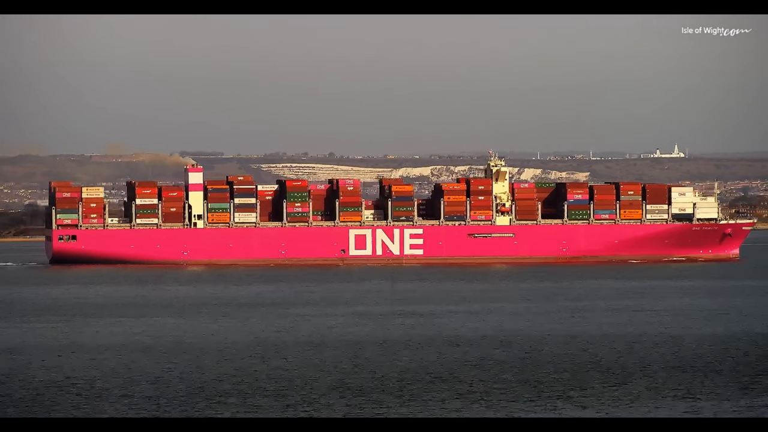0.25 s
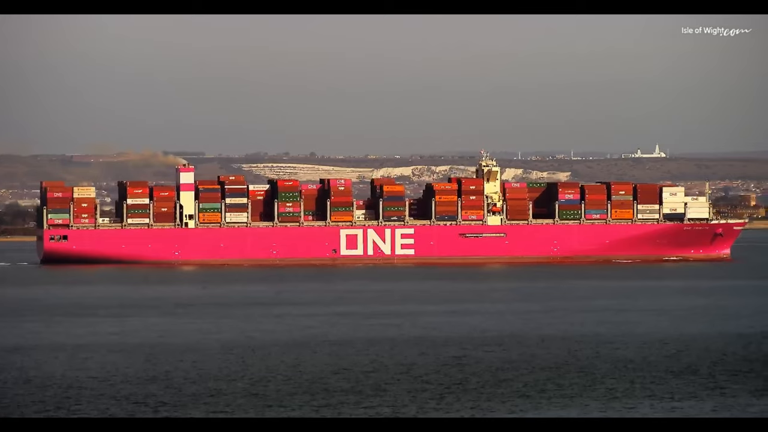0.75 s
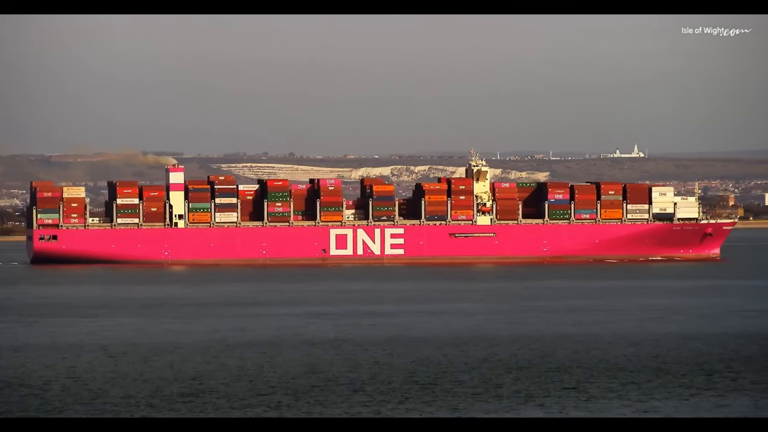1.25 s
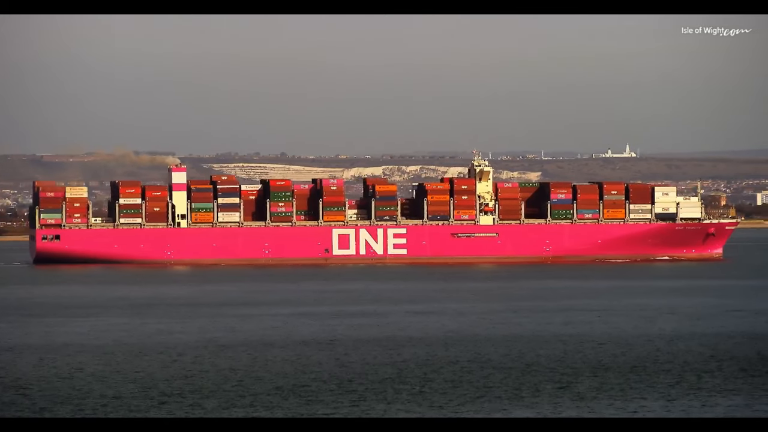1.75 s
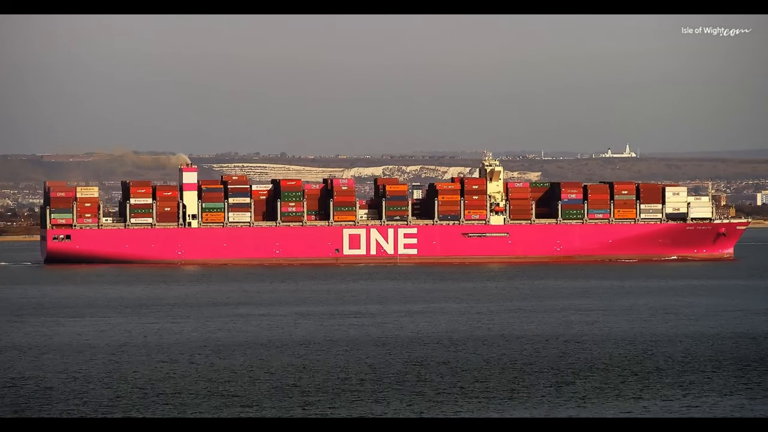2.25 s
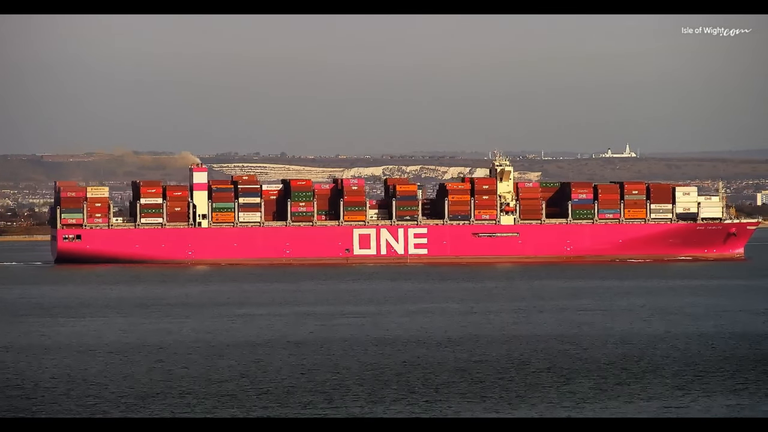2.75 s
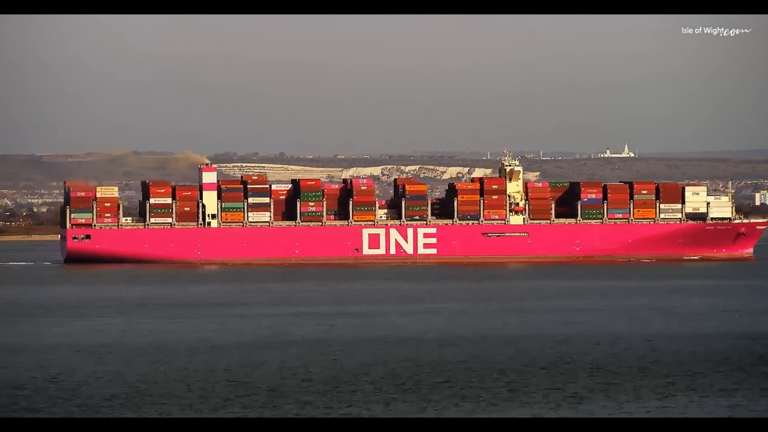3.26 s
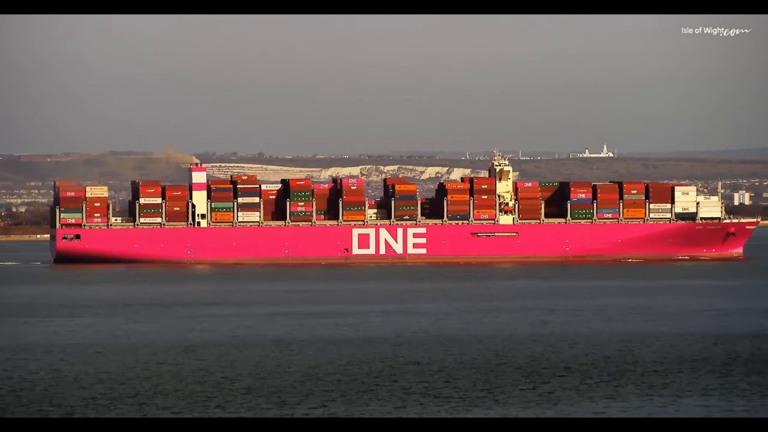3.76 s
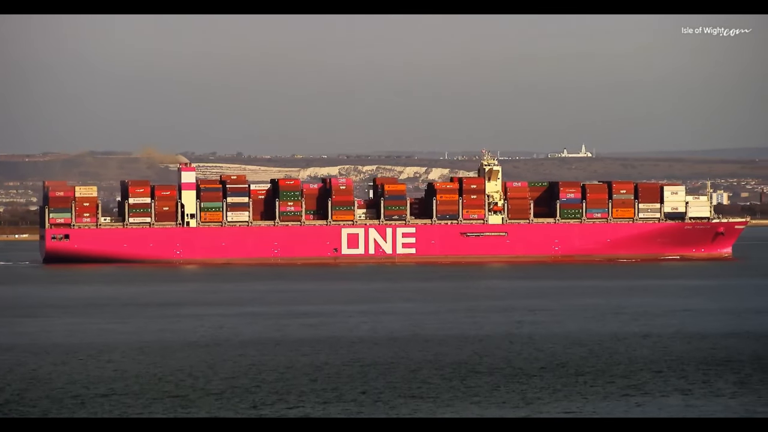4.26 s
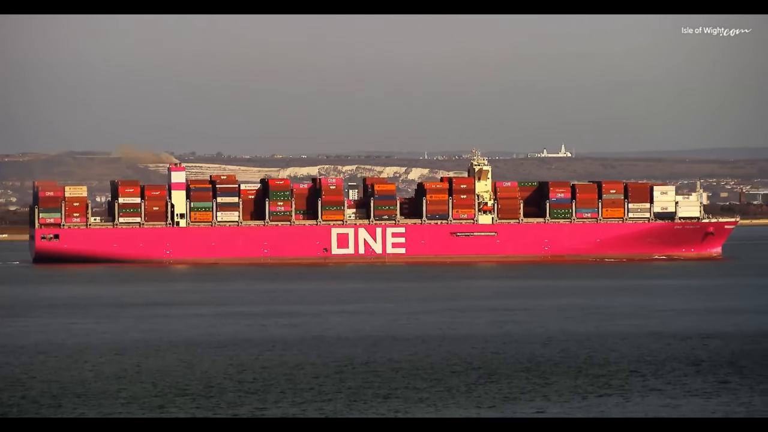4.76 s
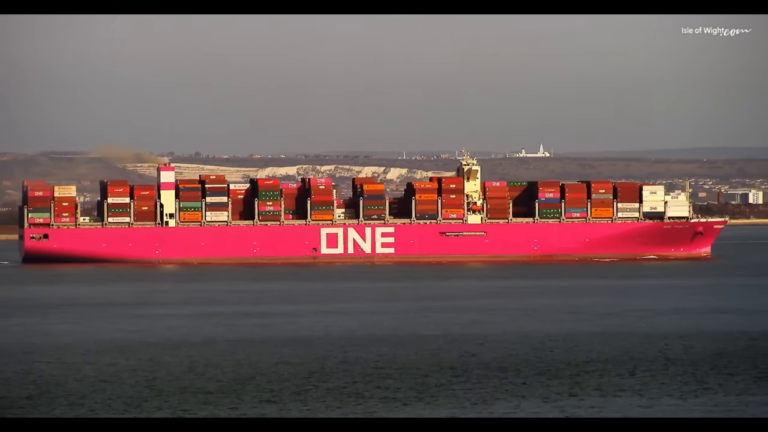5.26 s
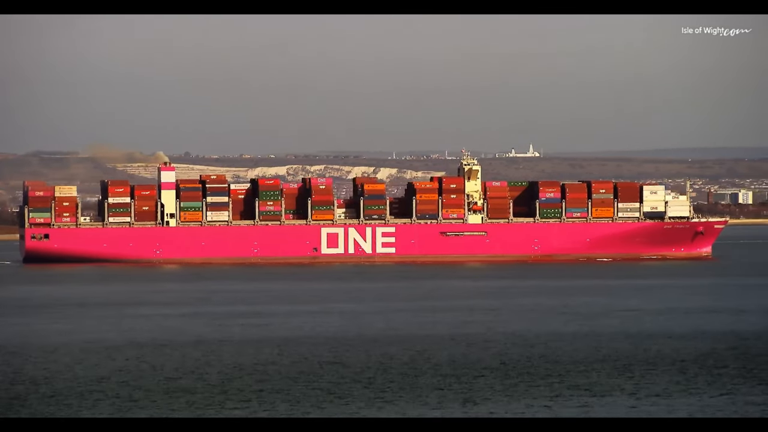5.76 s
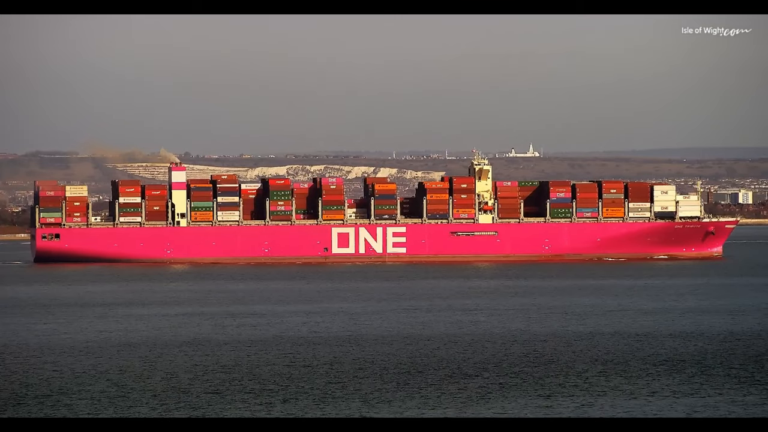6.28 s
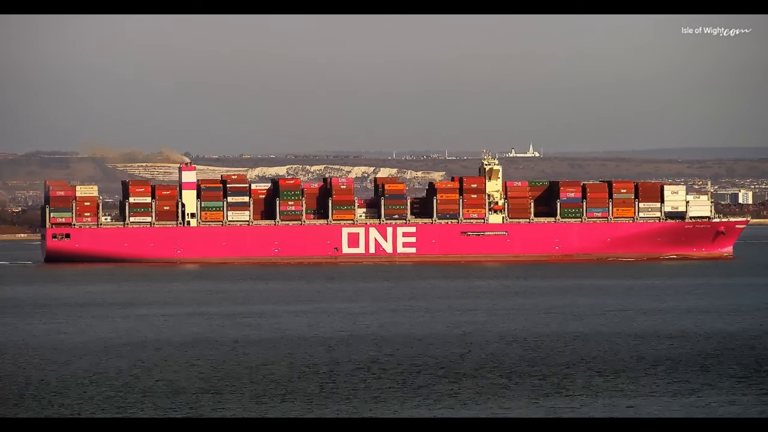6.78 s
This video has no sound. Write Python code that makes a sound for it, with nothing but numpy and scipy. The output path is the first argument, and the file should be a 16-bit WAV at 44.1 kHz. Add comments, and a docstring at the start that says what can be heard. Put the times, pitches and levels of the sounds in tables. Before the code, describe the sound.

Distant traffic rumbles and roars across open water, with a ship's heavy engine humming steadily through it.

```python
"""A low rumble and dull roar of distant town traffic across open water, one engine humming through it. Far
engines merge into the rumble, with deep booms; tyres into the roar, which grows a little midway and has brief
swells. Faint tread whine and hiss lie on top; nearer exhausts growl and surge. The heavy engine fires near 100
Hz and slowly gains speed; weaker steady tones follow the same shaft speed."""
import sys
import numpy as np
from scipy import signal
from scipy.fft import rfft, irfft, next_fast_len
from scipy.io import wavfile
from scipy.ndimage import uniform_filter1d

SR = 44100
rng = np.random.default_rng(int(sys.argv[2]) if len(sys.argv) > 2 else 0)


def to_wav(sig):
    """Store sig (one row per channel, or 1-D mono) as 16-bit WAV at the path in sys.argv[1].

    Samples outside -1..1 are clipped; the rate is SR.
    """
    pcm = np.clip(np.atleast_2d(sig), -1, 1) * 32767
    pcm = np.round(pcm).astype(np.int16)
    wavfile.write(sys.argv[1], SR, pcm.T)  # frames by channels


N = 309582


def from_db(db):
    """Decibels to gain."""
    return 10 ** (np.asarray(db) / 20)


def curve(rows):
    """Rows of (t/s, value), interpolated per sample."""
    return np.interp(np.arange(N) / SR, *np.transpose(rows))


def ramp(per_s):
    """Linear trend, zero at mid-scene."""
    return per_s * (np.arange(N) - N / 2) / SR


def bell(at_s, sigma_s):
    """Gaussian envelope, peak 1."""
    out = np.zeros(N)
    near = np.arange(max(int((at_s - 5 * sigma_s) * SR), 0), min(int((at_s + 5 * sigma_s) * SR), N))
    out[near] = np.exp(-.5 * ((near / SR - at_s) / sigma_s) ** 2)
    return out


def lifts(rows):
    """Smooth passing rises in level, in dB."""
    return sum(db * bell(at_s, sigma_s) for at_s, sigma_s, db in rows)


def drift(rate_hz):
    """Random wander, standard deviation 1: noise low-passed at rate_hz."""
    hop, settle = 40, 2000
    pole = np.exp(-2 * np.pi * rate_hz * hop / SR)
    white = rng.standard_normal(N // hop + settle + 2)
    slow = signal.lfilter([1], [1, -2 * pole, pole * pole], white)[settle:]
    return np.interp(np.arange(N) / hop, np.arange(len(slow)), slow / slow.std())


def roar(colour, humps, band_hz):
    """Many far sources merged: coloured noise with peaks and dips, rms 1 inside the band."""
    size = next_fast_len(N)
    hz = np.maximum(np.arange(size // 2 + 1) * SR / size, 1)
    colour_hz, colour_db = np.transpose(colour)
    db = np.interp(np.log(hz), np.log(colour_hz), colour_db)
    for centre_hz, width_hz, height_db in humps:
        db += height_db / (1 + (2 * (hz - centre_hz) / width_hz) ** 2)
    spectrum = rfft(rng.standard_normal(size)) * from_db(db)
    in_band = irfft(spectrum * (hz > band_hz[0]) * (hz < band_hz[1]), size)
    return irfft(spectrum, size)[:N] / in_band.std()


def steady(x, window_s):
    """Running engines keep their power: swells slower than the window are evened out."""
    size = int(window_s * SR)
    power = uniform_filter1d(uniform_filter1d(x * x, size), size)
    return x * x.std() / np.sqrt(power + 1e-12)


def rumble():
    """Far engines merge into a deep rumble that throbs at random and slowly grows."""
    # rumble spectrum: f/Hz, level/dB
    colour = [(5, -31.5), (16, -10), (27, -9.5), (40, -4.5), (68, -5), (85, -10), (120, -28), (300, -63.5),
              (2000, -120)]
    # exhaust resonances: f/Hz, width/Hz, gain/dB
    humps = [(31, 8, 8.5), (50.5, 9.5, 9), (61, 7.1, 5.5)]
    level_db = -33.5 + ramp(per_s=0.35) + drift(3.1)
    return from_db(level_db) * steady(roar(colour, humps, band_hz=(20, 85)), window_s=0.24)


def booms():
    """Now and then the rumble gathers into a boom around one unsteady pitch."""
    # booms: t/s, sigma/s, f/Hz, level/dB
    events = [(.45, 0.045, 49.9, -27.5), (.89, 0.083, 55.8, -34.5), (1.74, 0.11, 46.8, -30.5),
              (2.42, 0.054, 55, -28.5), (2.7, 0.068, 51.3, -27.5), (3.13, 0.029, 28, -27),
              (3.76, 0.032, 45, -29.5), (4.1, 0.026, 52, -26.5), (4.33, 0.04, 52.3, -33),
              (4.48, 0.044, 54, -28), (4.63, 0.033, 54, -26.5), (5.14, 0.042, 51, -29),
              (5.3, 0.046, 52.4, -30), (5.82, 0.054, 55, -34), (6.36, .05, 32, -30),
              (6.61, 0.032, 51.4, -32), (6.88, 0.044, 50, -35.5)]
    waver_hz = 3.94
    out = np.zeros(N)
    for at_s, sigma_s, hz, db in events:
        phase = 2 * np.pi * np.cumsum(hz + waver_hz * drift(11.2)) / SR
        out += from_db(db) * bell(at_s, sigma_s) * np.sqrt(2) * np.sin(phase)
    return out


def wall_echoes(x):
    """Late copies from nearby walls ripple the spectrum; the power stays the same."""
    # reflections: delay/s, gain/dB
    echoes = [(.0118, -22), (.0193, -23), (.031, -22)]
    out = x + sum(from_db(db) * np.roll(x, int(delay_s * SR)) for delay_s, db in echoes)
    return out * x.std() / out.std()


def churn(x, depth_db, rate_hz):
    """Eddies along the way lift and drop each octave of the roar on its own."""
    # octave centres: f/Hz
    centres_hz = (250, 500, 1000, 2000)
    size = next_fast_len(N)
    spectrum = rfft(x, size)
    octave = np.log2(np.maximum(np.arange(len(spectrum)) * SR / size, 1))
    shares = [np.interp(octave, np.log2(centres_hz), row) for row in np.eye(len(centres_hz))]
    bands = [irfft(spectrum * share, size)[:N] for share in shares]
    return sum(band * from_db(depth_db * drift(rate_hz)) for band in bands)


def traffic():
    """Exhaust drone, road and tyre roar and thin hiss, each following the flow by its own share."""
    # traffic flow: t/s, level/dB re usual
    flow = [(0.15, -5.5), (.65, -4.5), (1.1, -1.5), (1.6, -2.5), (2.3, -1.2), (3.0, -2.5), (3.85, 2.5),
            (4.6, 2.5), (5.2, 0.5), (5.85, -0.3), (6.4, -0.5), (7.02, -2.5)]
    # layer spectra: f/Hz, level/dB
    drone_colour = [(100, -24), (170, -8.5), (205, -1), (238, -8.5), (265, -4), (320, -2.5), (385, -7.5),
                    (430, -7.5), (520, -24.5), (3000, -79.5)]
    road_colour = [(250, -24), (380, -1), (440, 0), (510, -0.5), (560, -2.5), (680, -4), (800, -5),
                   (1000, -18), (4000, -67.5)]
    tyre_colour = [(500, -18.5), (850, 2), (1100, 2), (1380, 0), (1700, 1), (2000, -2), (2200, -2.5),
                   (2320, -6.5), (2650, -8.5), (2900, -11.5), (3400, -13.5), (4300, -22.5), (6000, -44),
                   (11000, -64.5)]
    hiss_colour = [(2000, -13), (4000, 2), (5000, -2.5), (6000, -7.5), (7000, -11), (8500, -14.5),
                   (10000, -16), (11000, -25.5)]
    # static peaks and dips in the roar, the upper ones from reflections: f/Hz, width/Hz, gain/dB
    drone_humps = [(256, 7.1, 9.3), (323, 15, 0.37)]
    road_humps = [(491, 54, 3.4), (652, 40, 2.7)]
    tyre_humps = [(965, 85, 6), (1052, 50, 2.8), (1412, 35, -1.8), (1467, 36, 2.7), (1510, 30, -2.3),
                  (1555, 30, 1.8), (1735, 35, 1.8), (1885, 60, -1.8), (1975, 50, 2.2), (2085, 50, -2),
                  (2280, 50, -3)]
    # hiss lifts as the flow peaks: t/s, sigma/s, gain/dB
    hiss_lifts = [(3.37, .04, 1.2), (3.67, .06, 3.6)]
    flow_db = curve(flow)
    drone_db = -41.5 + 0.55 * flow_db + 0.1 * drift(3.7)
    road_db = -45 + 0.65 * flow_db + ramp(per_s=-0.17)
    tyre_db = -47 + 0.25 * flow_db + 0.62 * drift(3.9)
    hiss_db = -71.5 + 0.26 * flow_db + ramp(per_s=0.13) + lifts(hiss_lifts) + 0.96 * drift(20)
    drone_noise = roar(drone_colour, drone_humps, band_hz=(190, 420))
    drone = from_db(drone_db) * steady(drone_noise, window_s=0.31)
    road = from_db(road_db) * roar(road_colour, road_humps, band_hz=(420, 800))
    tyres = from_db(tyre_db) * wall_echoes(roar(tyre_colour, tyre_humps, band_hz=(800, 3000)))
    hiss = from_db(hiss_db) * roar(hiss_colour, [], band_hz=(4000, 10000))
    return churn(drone + road + tyres, depth_db=0.7, rate_hz=10) + hiss


def swells():
    """Brief swells in the roar, a short thud and puffs of hiss, each a burst of band noise."""
    # bursts: t/s, sigma/s, f/Hz, width/octaves, level/dB
    events = [(.66, 0.055, 280, 0.78, -39.5), (1.05, 0.22, 222, 0.58, -44.5), (2.57, 0.035, 284, 0.54, -37),
              (2.7, 0.065, 695, 0.6, -46), (3.07, 0.043, 239, 0.95, -33), (3.13, 0.0069, 900, 0.85, -41),
              (3.27, 0.085, 341, 0.33, -42.5), (3.38, 0.02, 2920, 0.8, -60), (3.41, 0.045, 526, 2.2, -43),
              (3.66, 0.092, 3000, 0.78, -62.5), (3.65, 0.35, 210, 0.97, -44), (3.7, 0.3, 329, 0.38, -43.5),
              (3.88, 0.14, 1770, 0.8, -59.5), (4.45, .06, 1105, 0.46, -51), (4.5, 0.11, 1748, 0.083, -55.5),
              (6.27, 0.044, 298, 0.74, -46), (6.52, 0.13, 534, 0.46, -47.5), (6.75, 0.06, 1130, 0.088, -53),
              (6.88, 0.1, 418, 1.6, -45)]
    out, white = np.zeros(N), rng.standard_normal(N)
    for at_s, sigma_s, hz, octaves, db in events:
        edges_hz = hz * 2 ** (np.array([-.5, .5]) * octaves)
        bandpass = signal.butter(3, edges_hz, "band", fs=SR, output="sos")
        noise = signal.sosfilt(bandpass, np.roll(white, rng.integers(N)))
        out += from_db(db) * bell(at_s, sigma_s) * noise / noise.std()
    return out


def tread_whine():
    """Tyre treads sing faintly near one pitch, flaring and creeping upward."""
    # whine flares: t/s, gain/dB
    flares = [(.07, 11), (.45, 7), (.74, 10.5), (1.13, 10), (1.49, 8.5), (1.85, 5), (2.24, 9), (2.72, 9.5),
              (3.05, 10.5), (3.32, 2), (3.64, 8), (3.84, 9.5), (4.26, 7), (4.45, 8), (4.73, -1), (5.26, 6),
              (5.69, 8.5), (6.11, 8), (6.46, 5), (6.74, 5)]
    waver_hz, width_hz, flare_sigma_s = 16, 41, .055
    hz = 1003 + ramp(per_s=7) + waver_hz * drift(5.96)
    phase = 2 * np.pi * np.cumsum(hz) / SR
    narrow_noise = drift(width_hz) * np.sin(phase) + drift(width_hz) * np.cos(phase)
    level_db = -59.5 + lifts([(at_s, flare_sigma_s, db) for at_s, db in flares])
    return from_db(level_db) * steady(narrow_noise, window_s=0.056)


def exhausts():
    """Nearer exhausts growl just above the hum, easing off and surging again."""
    # growl spectrum: f/Hz, level/dB
    colour = [(60, -14), (80, -4.5), (92, -2), (100, -3.5), (110, 1), (124, 0.5), (137, -5.5), (156, -7),
              (182, -13.5), (230, -20), (600, -72.5)]
    # surges: t/s, sigma/s, gain/dB
    surges = [(.13, .06, 2.5), (.5, 0.067, 6), (.72, 0.052, 3.5), (.93, 0.048, 7), (1.17, 0.05, 4.5),
              (1.8, 0.069, 4), (2.13, 0.091, 2.5), (2.45, .05, 5), (3.25, 0.18, 6.5), (3.77, 0.046, 4.5),
              (4.01, 0.042, 8), (4.25, 0.074, 3.5), (4.55, 0.079, 6.5), (4.84, 0.055, 7), (5.3, 0.19, 6),
              (6.3, 0.13, 5.5), (6.72, 0.12, 7)]
    growl = steady(roar(colour, [], band_hz=(112, 200)), window_s=0.094)
    return from_db(-41 + lifts(surges)) * growl


def engine():
    """The firing hum and the weaker tones all follow one shaft speed; moving air makes the weaker ones fade and
    waver."""
    # shaft speed: t/s, f/Hz
    speed = [(0, 24.55), (1, 24.63), (2, 24.76), (3, 24.94), (4, 25.13), (5, 25.3), (6, 25.42),
             (7.02, 25.46)]
    # firing hum, swelling and dipping: t/s, level/dB
    firing_level = [(0.2, -33), (.85, -36), (1.45, -35), (2.0, -33.5), (2.6, -35), (2.98, -31.5),
                    (3.2, -31), (3.52, -37), (3.95, -33), (4.15, -35.5), (4.45, -31), (4.62, -36),
                    (4.78, -32), (5.0, -34), (5.2, -29), (5.45, -35.5), (5.7, -29), (6.15, -34.5),
                    (6.4, -33.5), (6.6, -34.7), (6.9, -31.5)]
    # weaker tones: shaft multiple, early level/dB, midway level/dB, late level/dB
    overtones = [(5, -48, -55, -60), (8, -55, -53, -55), (10, -66, -58, -57), (11, -48, -48, -62),
                 (12, -52, -53, -58), (13, -52.5, -53.5, -54), (16, -61, -66, -66), (17, -56, -59, -55),
                 (19, -61, -51, -53.5), (20, -60, -53, -55.5), (21, -63, -60, -58.5), (23, -62, -63, -57),
                 (24, -65, -61, -61), (25, -66, -65, -61), (26, -66, -58, -70), (27, -59, -68, -70),
                 (30, -70, -66, -64), (42, -72, -59, -56.5)]
    # early, midway and late moments: t/s
    overtone_times_s = (1.4, 3.9, 5.8)
    firings_per_turn, throb_hz, waver_rad = 4, 5, .2
    flutter_db, throb_db, fading_db = .9, 1.1, 1.8
    t = np.arange(N) / SR
    shaft_rad = 2 * np.pi * np.cumsum(curve(speed)) / SR
    firing_db = curve(firing_level) + flutter_db * drift(9)
    firing_db += throb_db * np.sin(2 * np.pi * throb_hz * t + drift(0.92))
    hum = from_db(firing_db) * np.sin(firings_per_turn * shaft_rad)
    for multiple, *levels_db in overtones:
        db = np.interp(t, overtone_times_s, levels_db) + fading_db * drift(2)
        phase = multiple * shaft_rad + waver_rad * drift(2.1) + rng.uniform(0, 2 * np.pi)
        hum += from_db(db) * np.sin(phase)
    return np.sqrt(2) * hum


def scene():
    """One engine over the merged traffic, in mono."""
    hum = engine()
    lows = rumble() + booms() + exhausts()
    return (hum + lows + traffic() + swells() + tread_whine())[None, :]


def record(dry):
    """Steep low-pass on the top treble."""
    cutoff_hz = 10900
    return signal.sosfilt(signal.ellip(12, .1, 80, cutoff_hz, fs=SR, output="sos"), dry)


dry = scene()
out = record(dry)
to_wav(out)
```